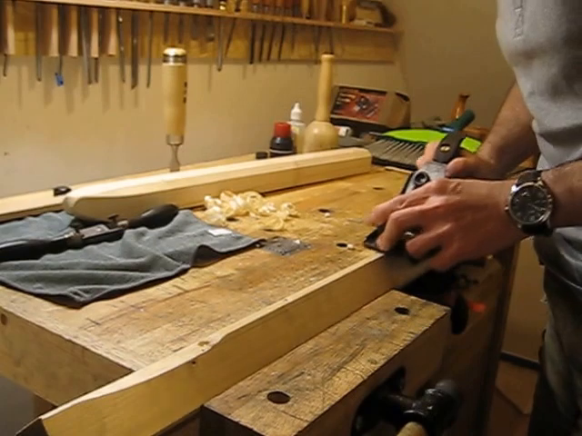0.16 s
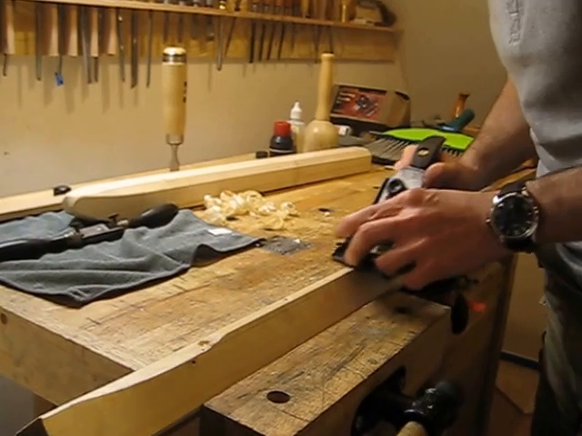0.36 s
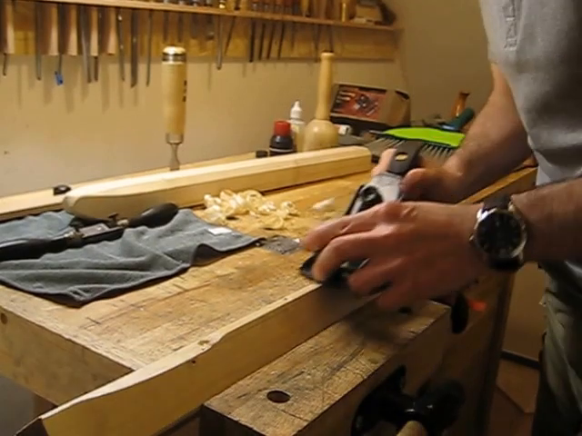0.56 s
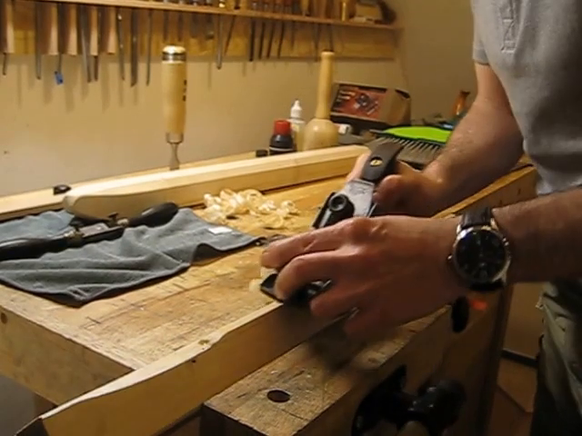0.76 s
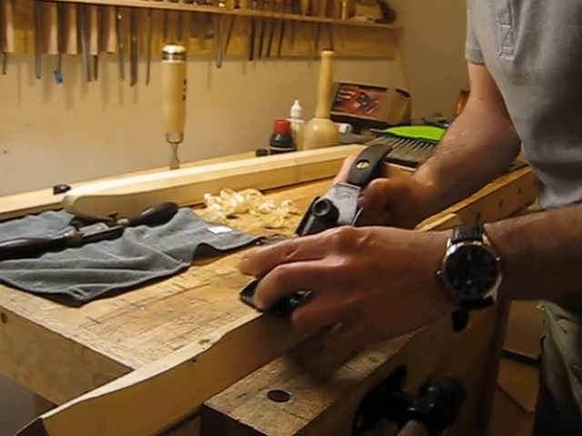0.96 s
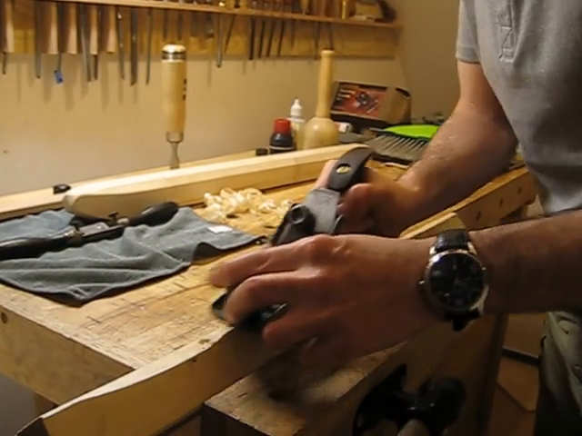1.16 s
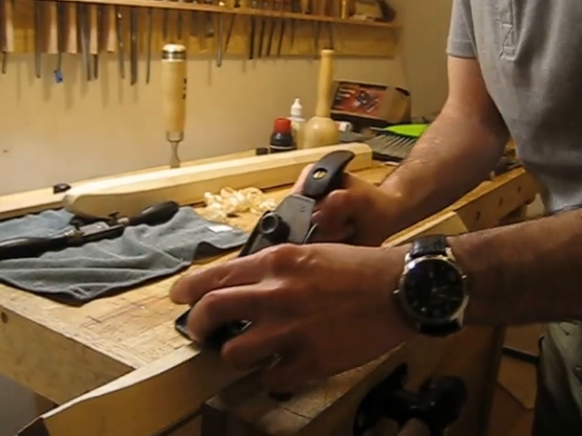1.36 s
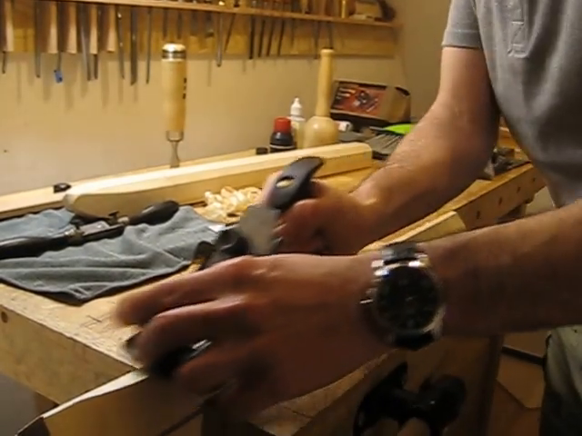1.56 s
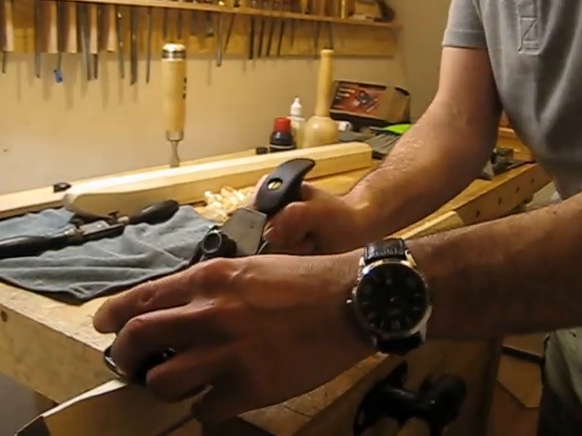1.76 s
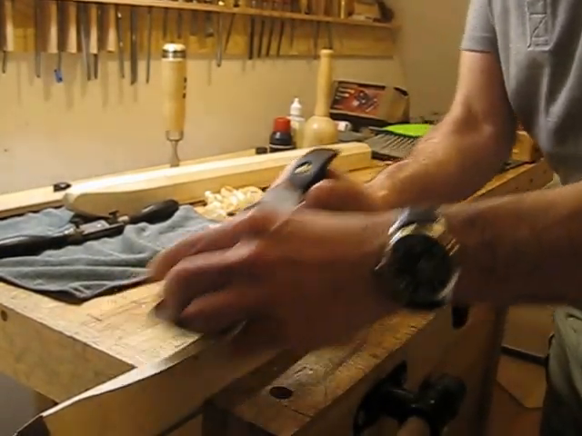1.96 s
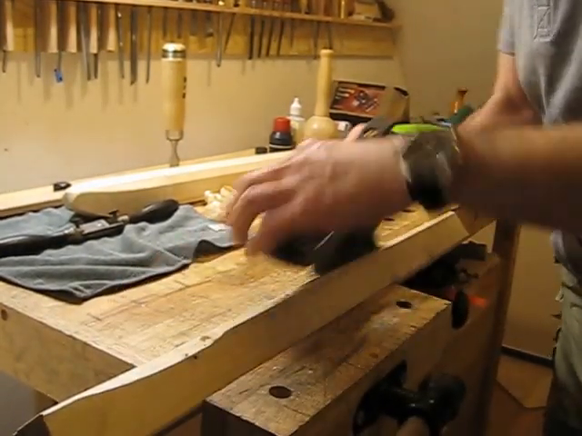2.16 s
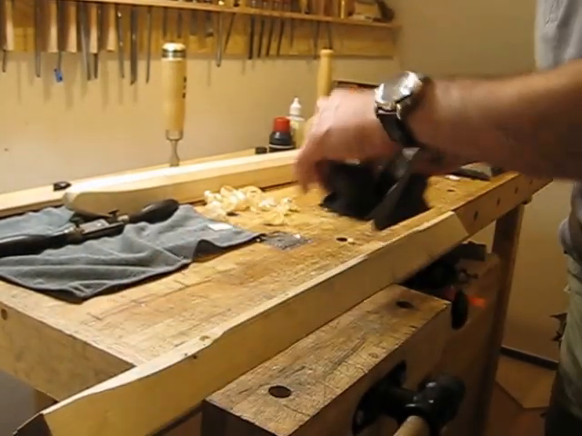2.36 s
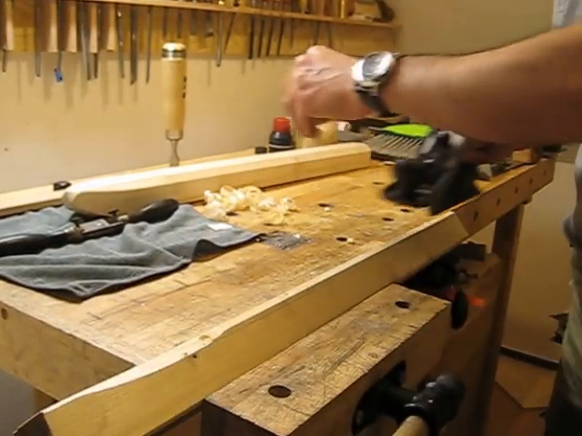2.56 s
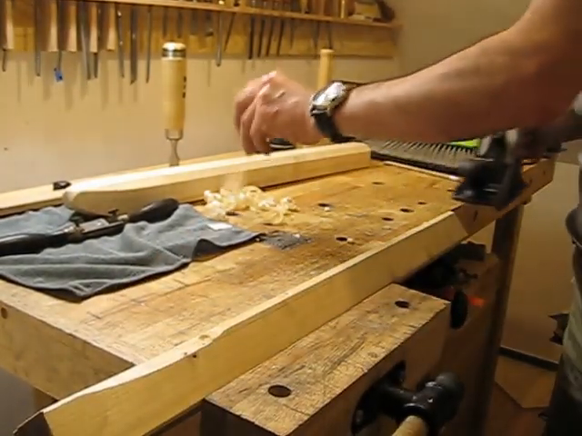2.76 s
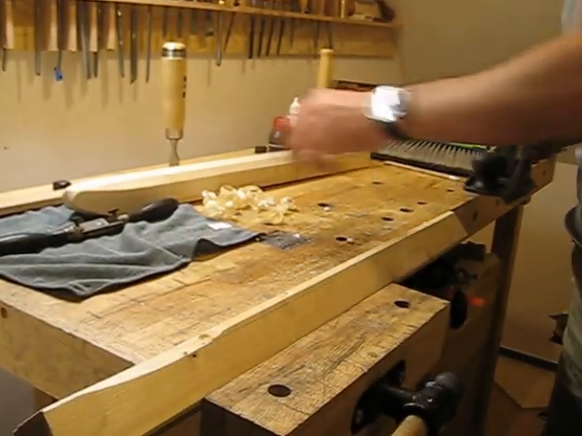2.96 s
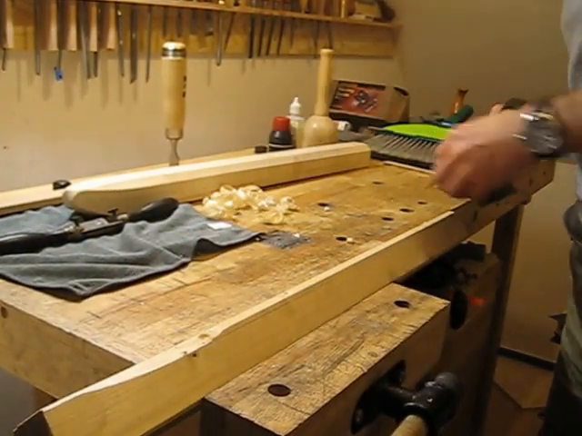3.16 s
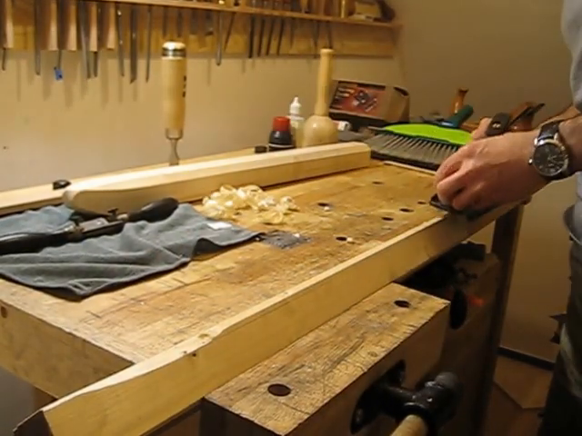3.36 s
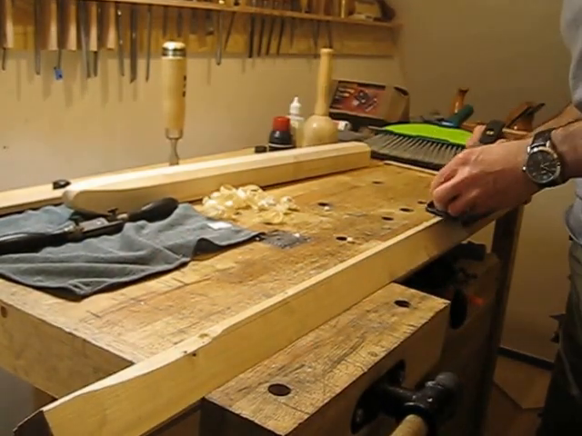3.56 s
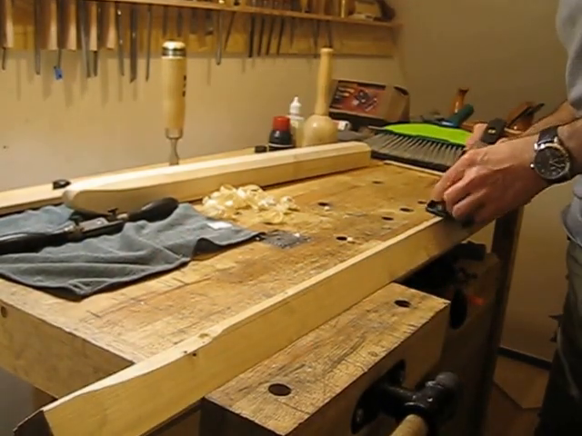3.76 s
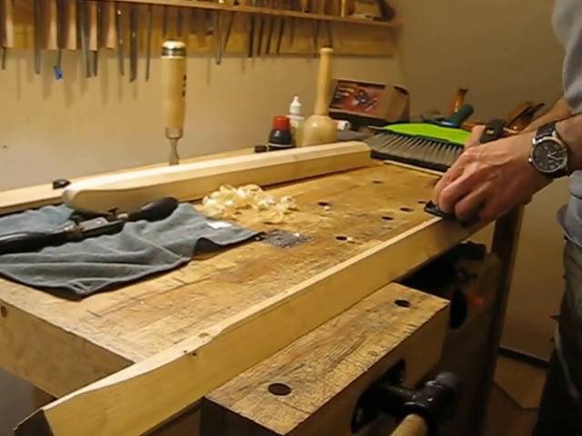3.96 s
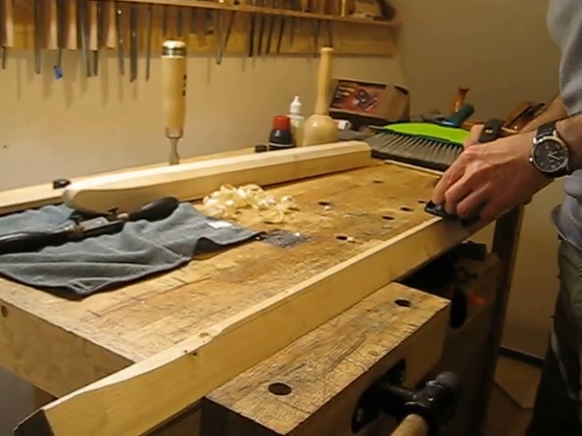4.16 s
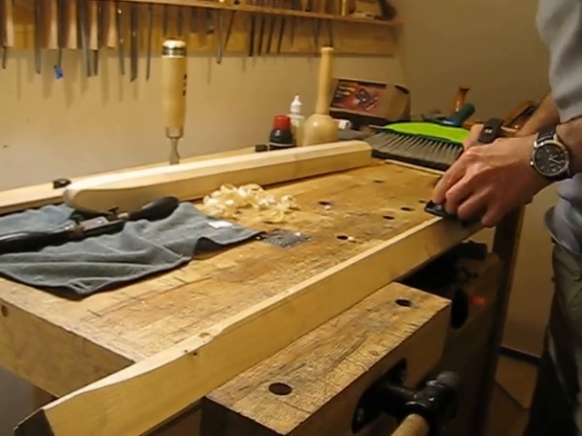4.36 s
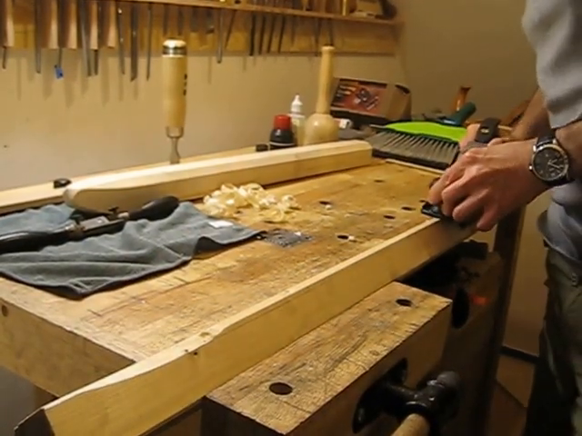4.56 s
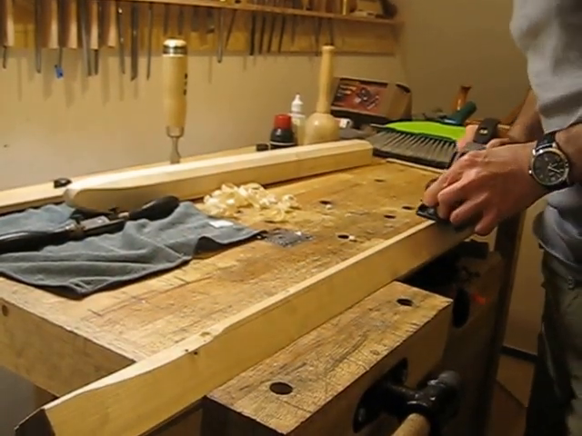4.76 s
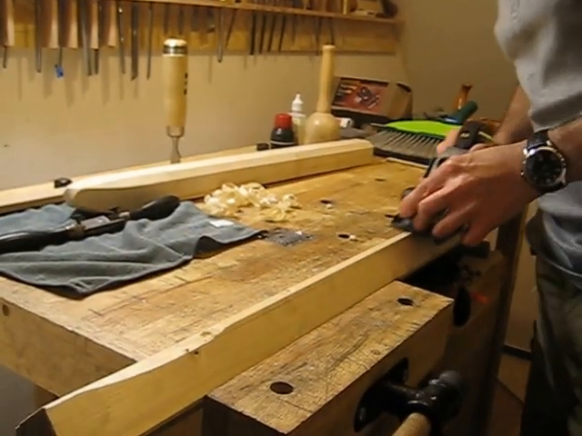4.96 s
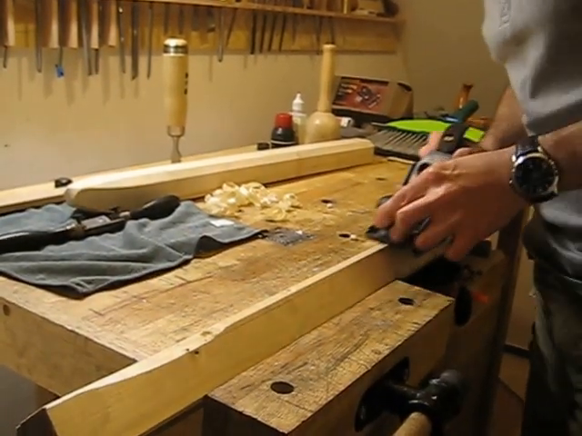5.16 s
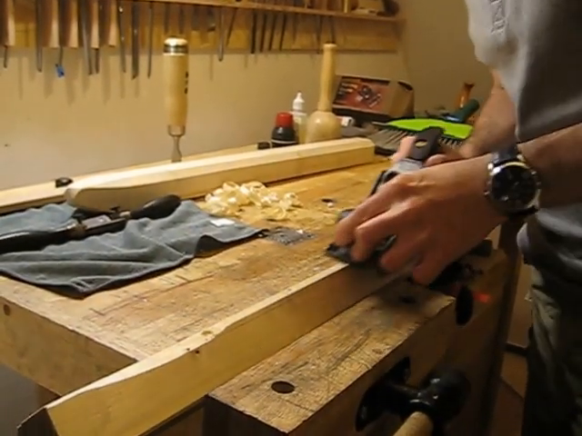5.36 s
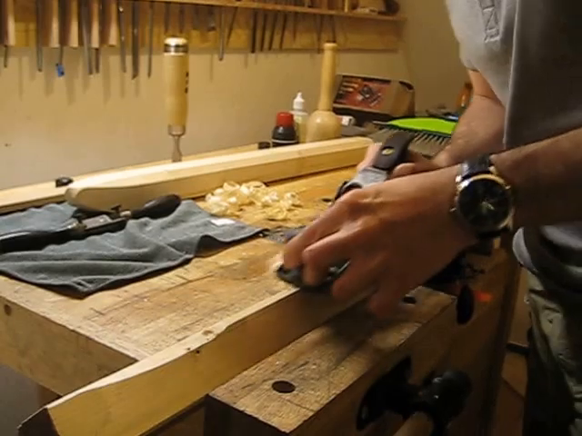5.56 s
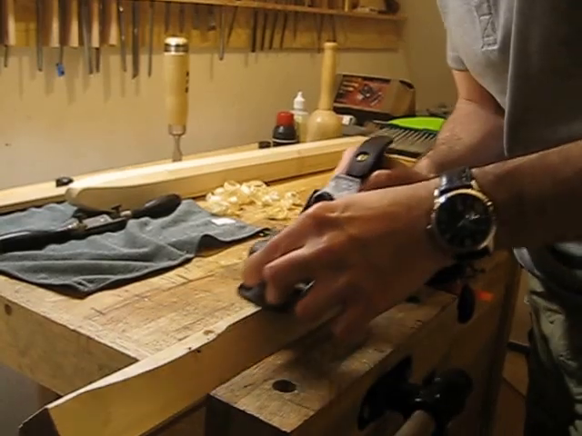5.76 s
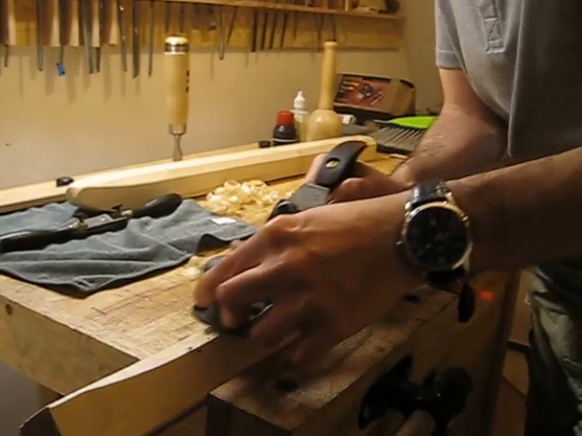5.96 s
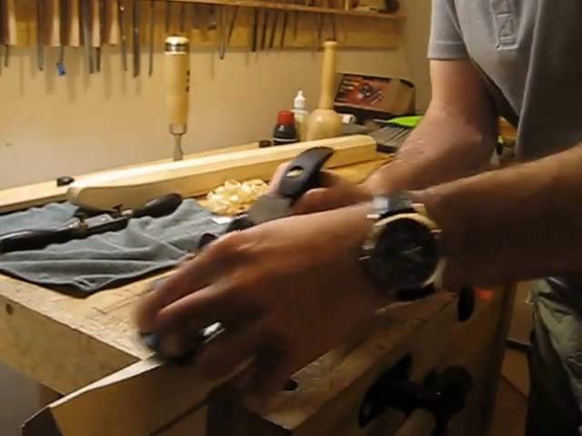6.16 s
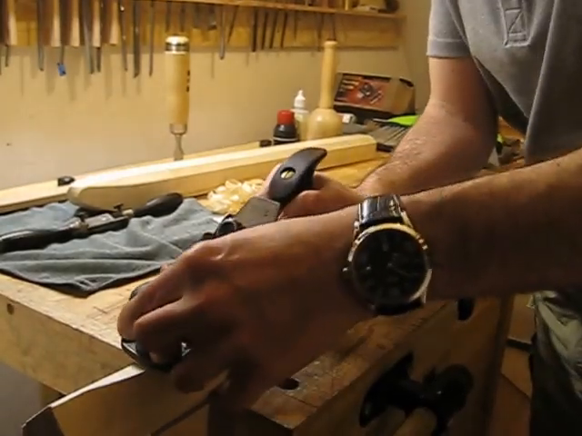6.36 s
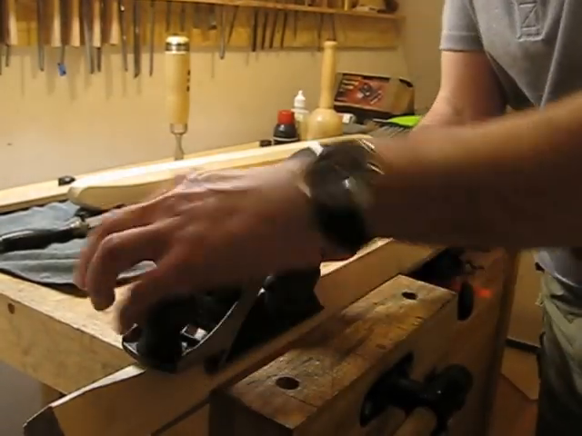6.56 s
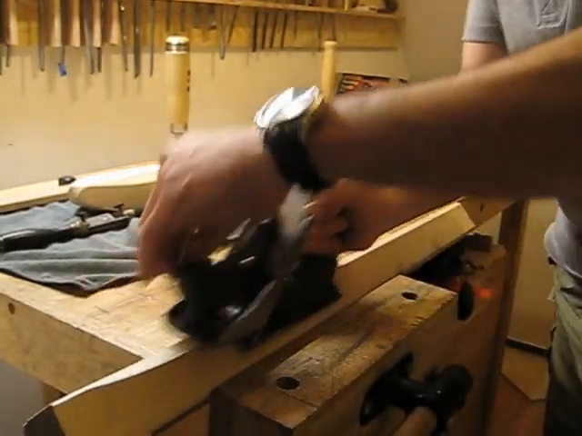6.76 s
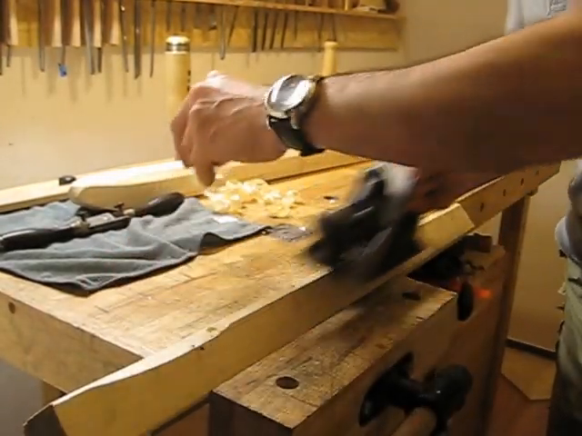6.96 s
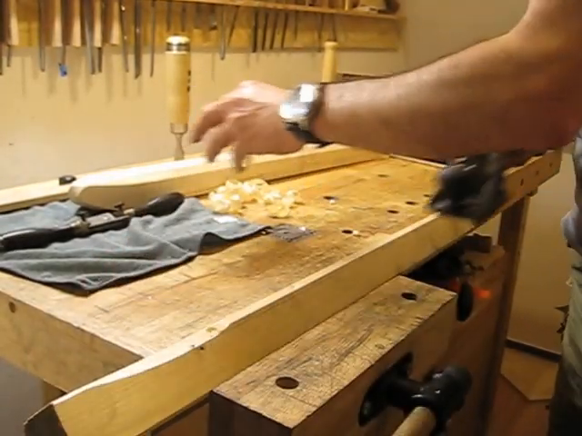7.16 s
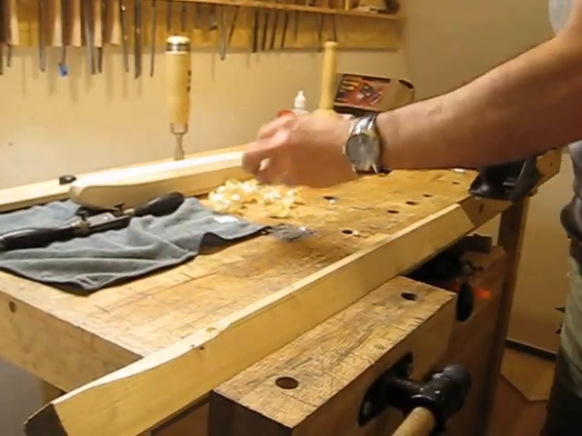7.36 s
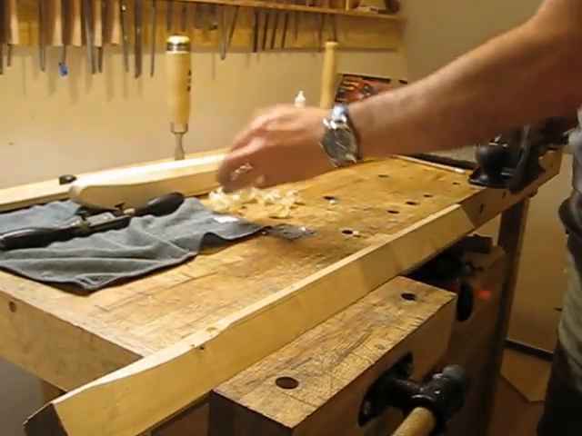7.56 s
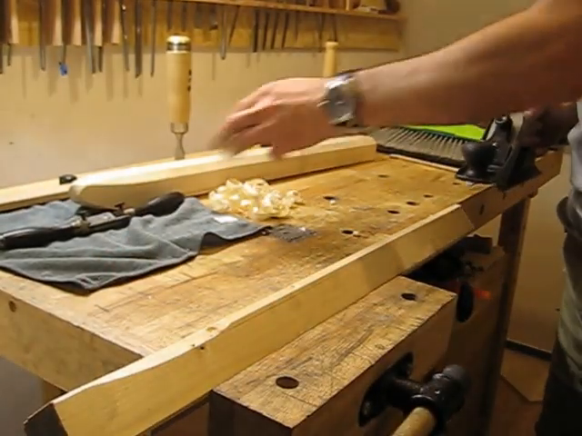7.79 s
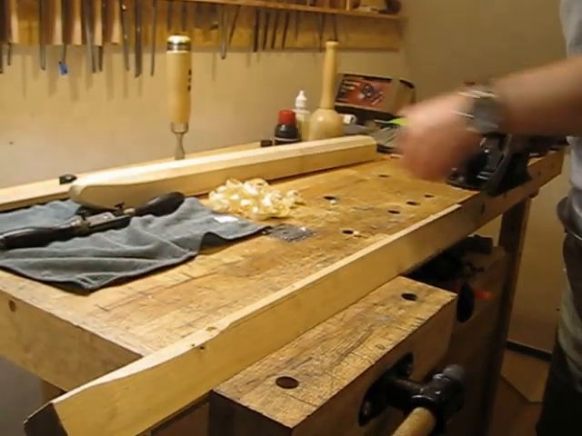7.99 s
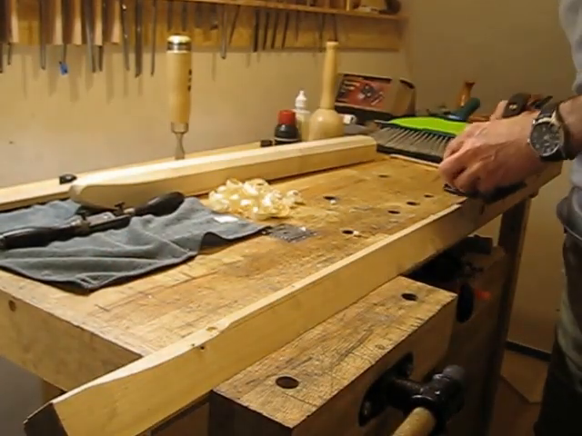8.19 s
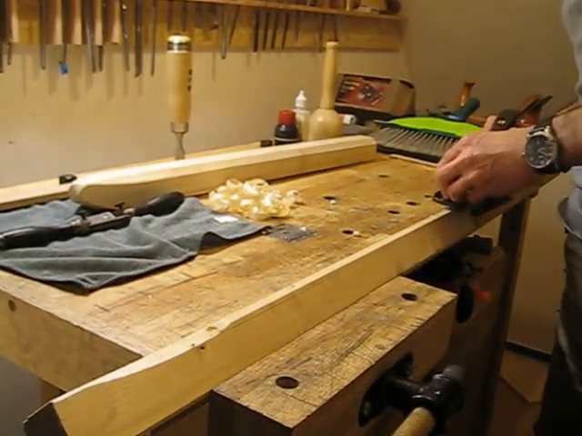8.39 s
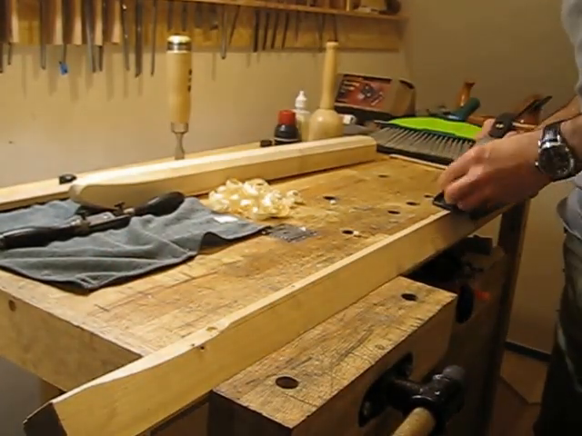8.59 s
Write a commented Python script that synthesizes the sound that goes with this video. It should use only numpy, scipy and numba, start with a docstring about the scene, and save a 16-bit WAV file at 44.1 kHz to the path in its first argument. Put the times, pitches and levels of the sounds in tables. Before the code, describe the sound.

A steel hand plane rasps along a wooden leg in one long stroke, the wood booming as the shaving hisses out. Dry shavings crackle softly, then the plane is set down with a sharp knock and clicks as it is rocked into place. A second long stroke follows with brief squeaks, then more crackling and a final knock. It sounds close, in a small workshop with faint hum and hiss.

```python
"""Two long rasping strokes of a steel hand plane along a wooden leg clamped to a bench in a small workshop.
The blade breaks fibres: the leg booms, the blade chatters, the shaving hisses out of the mouth.
After each stroke the shaving crackles as it is pulled out, and the plane is set down with a knock;
before the second it is rocked into place. Under it all lie room noise and mains hum.
The camera adds a thin whine and hiss, and turns its gain down on the loudest knocks."""
import sys
import numpy as np
from scipy import signal
from scipy.fft import rfft, irfft, next_fast_len
from scipy.io import wavfile
from scipy.ndimage import uniform_filter1d, map_coordinates
from numba import njit

SR = 44100
rng = np.random.default_rng(int(sys.argv[2]) if len(sys.argv) > 2 else 0)


def digitize_waveform(pressure):
    """Quantize a signal to 16-bit integers and store it at the path in sys.argv[1].

    Rows of a 2-D input are taken as channels; values are limited to [-1, 1].
    """
    field = np.atleast_2d(pressure).T
    bounded = np.clip(field, -1, 1)
    quanta = np.round(bounded * 32767).astype(np.int16)
    wavfile.write(sys.argv[1], SR, quanta)


N = 380583
TIME_S = np.arange(N) / SR

# steel plane modes: (frequency [Hz], level [dB], t60 [s])
PLANE_MODES = [(1110, -18, .14), (1144, -6, .14), (1285, -1, 0.11), (1680, -36, 0.096), (1677, -6, 0.26),
               (1860, -2.5, 0.22), (1933, 8.5, 0.059), (2056, 1.5, 0.19), (2223, 0, 0.052),
               (2390, 3.5, 0.033), (2400, -10, 0.071), (2743, -3.5, 0.084), (3000, 6.5, 0.081),
               (3370, 7.5, 0.057), (3779, -19, .13), (4340, 4, 0.097), (4600, -8, 0.19), (5070, -27, 0.11)]
# wooden leg modes: (frequency [Hz], level [dB], t60 [s])
LEG_MODES = [(443, -6.5, 0.058), (476, 5.5, 0.04), (554.4, -7.5, 0.19), (617.3, -2, 0.23), (679, -9, 0.18),
             (771, -1.5, 0.31), (842, -0.5, 0.29), (883, -12, 0.056), (971, 1, 0.22), (1340, 2, .14),
             (1376, 10.5, 0.081), (4160, -6, .16)]
# bench modes: (frequency [Hz], level [dB], t60 [s])
BENCH_MODES = [(80.6, -10, 0.49), (162, -0.5, 0.22), (204, 2, 0.36), (228.8, 2, 0.16), (277, -3, 0.15),
               (312.4, -13, 0.39), (358, -5, 0.28)]
# fibre rasp: (frequency [Hz], level [dB])
RASP_SPECTRUM = [(60, -76), (300, -63), (800, -8), (1050, 0), (1500, -2), (2000, -1.5), (2600, 0.5),
                 (3300, -6), (4000, -14.5), (4700, -7), (5400, -23), (9000, -41)]
# blade chatter: (frequency [Hz], level [dB])
CHATTER_SPECTRUM = [(100, -77), (330, -10.5), (460, -6), (620, 2.5), (1000, -4), (1400, -17.5), (4000, -42)]
def plane_strokes():
    """The blade breaks fibres; the breaks shake leg and plane while the shaving hisses out."""
    boom_db, chatter_db, rasp_db, hiss_db, fizz_db = stroke_levels_db()
    chatter_hz = chatter_pitch_hz()
    grip_db = wobble(28) + 1.42 * wobble(170)  # stick-slip in the grain
    cut = fractures(rate_hz=5000, scatter_db=3) * amp(grip_db)
    wood = through_modes(cut, BENCH_MODES + LEG_MODES, width_hz=4.2, lift=2.06)
    steel = through_modes(cut, PLANE_MODES, width_hz=11.4, lift=1)
    focus_db = np.clip(2.3 * (chatter_db + 15), -6, 3.5)
    chatter = gliding_ring(coloured(wood, CHATTER_SPECTRUM), chatter_hz, width_hz=45, focus_db=focus_db)
    rasp = coloured(edge_catching(steel, depth_db=2.5), RASP_SPECTRUM)
    hiss = shaving_hiss(grip_db, hiss_db, fizz_db)
    blade = amp(chatter_db - 2) * chatter + amp(rasp_db - 0.7) * rasp + hiss
    lows = filtered(blade, lambda hz: 1 / (1 + (hz / 500) ** 16))
    blade -= (1 - amp(-0.7 * skid_loss_db())) * lows  # skids also quieten the low wood
    cutting = bench_sway(cut) + leg_boom(wood, boom_db) + blade
    low_cut = signal.butter(3, 65, "high", fs=SR, output="sos")  # the strokes carry no deep bass
    return signal.sosfilt(low_cut, cutting)


# long strokes: (start [s], end [s], release t60 [s], boom [dB], hiss [dB])
STROKES = [(-0.05, 1.351, 0.57, -23.5, -32.5), (4.722, 6.174, 0.36, -26, -32.5)]
# depth of cut, one curve a stroke: (time [s], rasp level [dB])
BITE_CURVES = [
    [(0.0, -13), (0.082, -16.5), (0.126, -20.5), (0.348, -18), (0.36, -24), (0.65, -20), (0.71, -33),
     (0.758, -24.5), (0.804, -37.5), (1.01, -33), (1.108, -14.5), (1.142, -27), (1.262, -20.5), (1.35, -32)],
    [(4.79, -23), (4.918, -13), (5.168, -21), (5.324, -17.5), (5.338, -23.5), (5.546, -18), (5.596, -24),
     (5.9, -23), (5.912, -20.5), (5.998, -30), (6.088, -26.5), (6.126, -38), (6.166, -24.5), (6.19, -26.5)],
]
# push of the arms, one curve a stroke: (time [s], chatter level [dB])
PUSH_CURVES = [
    [(0.0, -23.5), (0.108, -18), (0.176, -23.5), (0.308, -17), (0.62, -20.5), (0.676, -11.5), (0.74, -20),
     (0.762, -13), (0.852, -29.5), (0.912, -31), (1.308, -13), (1.35, -25)],
    [(4.79, -30.5), (4.922, -18), (4.952, -24), (5.164, -21.5), (5.308, -14.5), (5.37, -19.5),
     (5.636, -17.5), (5.65, -15.5), (5.978, -16), (6.146, -26), (6.162, -17), (6.19, -29)],
]
# shaving tears off: (time [s], hiss change [dB], rasp change [dB])
TEARS = [(.75, -0.5, 3.5), (1.075, 7.5, -6), (5.32, -2, -2), (5.817, 10, 4.5), (5.92, -2, 3), (6.16, 6, 1)]
# shaving rushes out of the mouth: (time [s], half length [s], hiss change [dB], fizz change [dB])
FLARES = [(.05, 0.032, 5.5, -1), (0.553, 0.19, -2, 8), (4.886, 0.15, 5.5, 0), (5.467, 0.034, 1, 5)]
# short shoves that clear the leg's end or seat the blade: (start [s], end [s], level [dB], boom trim [dB])
SHOVES = [(1.47, 1.552, -25.5, -3), (4.411, 4.514, -25.5, -7.5)]
# shove mix: (boom [dB], chatter [dB], rasp [dB], hiss [dB], fizz [dB])
SHOVE_MIX_DB = (-0.5, -5, -2.5, -6.5, -27)
ENTRY_S, TEAR_HALF_S = 0.064, 0.017
def stroke_levels_db():
    """The arms' work sets five levels over time: boom, chatter, rasp, hiss and fizz."""
    tear_hiss_db = sum(db * swell(s, TEAR_HALF_S) for s, db, _ in TEARS)
    tear_rasp_db = sum(db * swell(s, TEAR_HALF_S) for s, _, db in TEARS)
    lull_db = sum(3 * swell(s + 0.047, 0.022) for s, *_ in TEARS)  # until the next curl forms
    flare_hiss_db = sum(db * swell(s, half_s) for s, half_s, db, _ in FLARES)
    flare_fizz_db = sum(db * swell(s, half_s) for s, half_s, _, db in FLARES)
    gains = np.zeros((5, N))
    for (start_s, end_s, t60_s, boom_db, hiss_db), bite, push in zip(STROKES, BITE_CURVES, PUSH_CURVES):
        bite_db = curve(bite)
        shaving_db = hiss_db + 0.11 * (bite_db + 25) + tear_hiss_db - lull_db
        levels_db = [boom_db + 4 * slowing(start_s, end_s) - skid_loss_db(),
                     curve(push),
                     bite_db + tear_rasp_db,
                     shaving_db + flare_hiss_db,
                     shaving_db - 15 + flare_fizz_db]
        gains += held(start_s, end_s, ENTRY_S, t60_s) * amp(levels_db)
    for start_s, end_s, db, boom_trim_db in SHOVES:
        mix_db = db + np.array(SHOVE_MIX_DB) + [boom_trim_db, 0, 0, 0, 0]
        gains += held(start_s, end_s, ENTRY_S, t60_s=0.44) * amp(mix_db)[:, None]
    return 20 * np.log10(gains + 1e-6)


def slowing(start_s, end_s):
    """The plane slows near full reach: 0 running freely, 1 at the stroke's end."""
    return np.clip((TIME_S - start_s) / (end_s - start_s), 0, 1) ** 6.05


# skids: (time [s], half length [s], boom loss [dB])
SKIDS = [(0.0, 0.13, 5.5), (0.17, .03, 1), (0.692, 0.062, 8), (1.1, 0.046, 4), (4.78, 0.068, 7.5),
         (5, 0.087, 17.5), (5.333, 0.08, 15), (5.563, 0.065, 15), (5.972, 0.032, 11)]
def skid_loss_db():
    """The leg booms less while the plane runs light."""
    return sum(db * swell(s, half_s) for s, half_s, db in SKIDS)


def chatter_pitch_hz(base_hz=668, sag_hz=190, skid_hz_per_db=2.8, wander_hz=35.3):
    """The chatter sinks as the plane slows, rises in skids and wanders with the grain."""
    sag = sum(slowing(start_s, end_s) * held(start_s, end_s, ENTRY_S, t60_s=0.77)
              for start_s, end_s, *_ in STROKES)
    return base_hz - sag_hz * sag + skid_hz_per_db * skid_loss_db() + wander_hz * wobble(14)


def edge_catching(x, depth_db):
    """The edge catches briefly, favouring now one resonance, now another."""
    bins = signal.stft(x, nperseg=512)[2]
    flicker = uniform_filter1d(rng.standard_normal(bins.shape), size=3, axis=0)
    flicker = uniform_filter1d(flicker, size=11, axis=1)
    return signal.istft(bins * amp(depth_db * unit(flicker)), nperseg=512)[1][:N]


# leg boom: (frequency [Hz], level [dB])
BOOM_SPECTRUM = [(35, -32), (70, -3), (115, -19), (138, -20), (160, 3), (200, -2.5), (340, 2), (520, -9.5),
                 (900, -51), (3000, -71)]
# leg resonance as the plane travels, one curve a stroke: (time [s], frequency [Hz])
BOOM_PITCH_CURVES = [
    [(.18, 205), (.26, 306), (.38, 323), (.43, 204), (.56, 205), (.67, 267), (.87, 167), (1.19, 168),
     (1.31, 214), (1.4, 167)],
    [(4.52, 330), (4.86, 172), (5.1, 254), (5.19, 175), (5.46, 337), (5.58, 343), (5.68, 210), (5.9, 165),
     (6.02, 226), (6.13, 182.5)],
]
def leg_boom(wood, level_db):
    """The harder the leg shakes, the more it locks on to one shifting resonance."""
    hz = curve(np.vstack(BOOM_PITCH_CURVES))
    ring = gliding_ring(coloured(wood, BOOM_SPECTRUM), hz, width_hz=32.5, focus_db=0.64 * (level_db + 31))
    return amp(level_db - 1.05) * ring


# shaving hiss: (frequency [Hz], level [dB])
HISS_SPECTRUM = [(300, -13), (1500, -12), (2500, 8), (5000, 2.5), (6500, 1.5), (8600, -1.5), (9800, -6),
                 (11500, -12), (14000, -49)]
# top-octave fizz: (frequency [Hz], level [dB])
FIZZ_SPECTRUM = [(8000, -13), (11500, -4), (13300, 8), (15500, -3)]
def shaving_hiss(grip_db, hiss_db, fizz_db):
    """The shaving curls out of the mouth in a dense run of tiny breaks."""
    curl = fractures(rate_hz=7000, scatter_db=4.5) * amp(1.2 * grip_db + 0.75 * wobble(60))
    return amp(hiss_db) * coloured(curl, HISS_SPECTRUM) + amp(fizz_db) * coloured(curl, FIZZ_SPECTRUM)


# bench rumble: (frequency [Hz], level [dB])
SWAY_SPECTRUM = [(45, -17), (75, -11), (105, 4), (150, -23), (400, -60)]
# bench sways: (time [s], half length [s], level [dB])
SWAYS = [(0.85, .12, -47), (1.2, 0.15, -43), (1.558, .06, -40), (4.62, 0.17, -51), (6.12, 0.043, -47)]
def bench_sway(cut):
    """The whole bench sways under the push."""
    return sum(amp(db) * swell(s, half_s) for s, half_s, db in SWAYS) * coloured(cut, SWAY_SPECTRUM)


# sole squeaks: (time [s], frequency [Hz], level [dB], half length [s])
SQUEAKS = [(4.478, 5010, -36.5, 0.026), (4.94, 1852, -26, 0.038), (5.542, 2390, -23.5, 0.042),
           (6.52, 1110, -49, 0.014)]
def sole_squeaks():
    """Steel sticks and slips on the wood for a moment at one wavering pitch."""
    out = np.zeros(N)
    for s, hz, db, half_s in SQUEAKS:
        envelope = np.exp(-0.5 * ((TIME_S - s) / half_s) ** 2)
        out += envelope * tone(hz, db, TIME_S, phase_rad=0.81 * wobble(130))
    return out


# plane set down on the leg: (time [s], level [dB], relative thud [dB])
LANDINGS = [(3.566, -1.5, -12), (8.5117, -1, -6.5)]
# sole rocked into place: (time [s], level [dB])
ROCKS = [(3.802, -28), (3.893, -18), (3.927, -18.5), (3.960, -11), (4.025, -26.5), (4.200, -13),
         (4.272, -8.5), (4.368, -22), (4.437, -6.5), (4.524, -9)]
def plane_knocks(heel_delay_s=0.004):
    """The plane lands toe first, then heel; rocking it into place mostly rings the steel."""
    out = np.zeros(N)
    for s, db, thud_db in LANDINGS:
        add(out, s, contact(db, crack_db=-4, thud_db=thud_db, leg_db=-12, plane_db=-37))
        add(out, s + heel_delay_s, contact(db + 1.8, crack_db=-4, thud_db=-8.5, leg_db=-23, plane_db=-36))
    for s, db in ROCKS:
        wood_db = -17.5 - 0.5 * db  # the wood follows only half of each change in dB
        add(out, s, contact(db, crack_db=-5, thud_db=wood_db - 4, leg_db=wood_db - 9, plane_db=-7.5))
    return out


# impact crack: (frequency [Hz], level [dB])
CRACK_SPECTRUM = [(100, -30), (400, -29), (800, -14), (1500, 5), (2500, -1), (3700, 4.5), (5200, -4.5),
                  (7300, -3), (10000, -10), (15000, -18)]
# crack decay: (frequency [Hz], t60 [s])
CRACK_DECAY = [(300, 0.13), (1000, 0.068), (3000, 0.023), (8000, 0.025), (15000, .018)]
# dense weak modes of the plane: (frequency [Hz], level [dB])
CLACK_SPECTRUM = [(200, -37), (700, -15), (1200, -5.5), (2000, 0), (2700, 1), (3600, -22), (4900, 0.5),
                  (5600, -14), (12000, -40)]
# dense weak modes of the leg: (frequency [Hz], level [dB])
KNOCK_SPECTRUM = [(100, -41), (400, -32), (650, 6), (900, 9), (1500, -5), (2400, -16), (4400, -9),
                  (5400, -39), (12000, -52)]
# bench and the things on it: (frequency [Hz], level [dB])
THUMP_SPECTRUM = [(50, -37), (110, -36), (160, 2), (280, -8.5), (550, -7), (700, -15), (1200, -13.5),
                  (2500, -27), (8000, -53)]
def contact(db, crack_db, thud_db, leg_db, plane_db):
    """Steel lands on wood: a crack, the ring of plane and leg, and the slower thud of the bench."""
    t = np.arange(SR // 2) / SR
    crack = amp(crack_db) * dying(noise(CRACK_SPECTRUM, len(t)), CRACK_DECAY)
    plane = ringing(PLANE_MODES, t) + amp(0.5) * burst(CLACK_SPECTRUM, t, t60_s=0.13)
    leg = ringing(LEG_MODES, t) + amp(1.5) * burst(KNOCK_SPECTRUM, t, t60_s=0.22)
    ring = (amp(plane_db) * plane + amp(leg_db) * leg) * rise(t, 0.0014)
    cutoff_hz = min(1650 + 7500 * amp(1.7 * db), 0.45 * SR)  # harder is brighter
    strike = signal.lfilter(*signal.butter(2, cutoff_hz, fs=SR), crack + ring)
    clutter = amp(-5) * burst(THUMP_SPECTRUM, t, t60_s=0.26)
    thud = amp(thud_db) * (ringing(BENCH_MODES, t) + clutter) * rise(t, 0.035)
    return amp(db) * (strike + thud)


# soft bumps of the sole: (time [s], level [dB])
BUMPS = [(2.036, -16), (2.055, -18.5), (2.109, -24), (2.175, -31), (6.932, -19), (6.968, -19.5), (7.0, -26),
         (7.04, -32)]
def return_bumps():
    """The sole brushes the leg on its way back, and the bench answers."""
    out, t = np.zeros(N), np.arange(SR // 3) / SR
    for s, db in BUMPS:
        bump = burst(THUMP_SPECTRUM, t, t60_s=0.22) + amp(-6.5) * ringing(BENCH_MODES, t)
        add(out, s, amp(db - 9) * bump * rise(t, 0.002))
    return signal.lfilter(*signal.butter(2, 120, "high", fs=SR), out)  # too light to move the whole bench


# loose shavings handled: (start [s], end [s], level [dB])
RUSTLES = [(2.028, 2.055, -42), (2.08, 2.127, -41.5), (2.262, 2.276, -41), (2.326, 2.338, -40),
           (2.412, 2.456, -37.5), (2.543, 3.2, -52), (2.835, 2.832, -45), (6.687, 6.764, -33.5),
           (6.908, 6.925, -39.5), (6.968, 6.99, -39.5), (7.325, 7.705, -45)]
# shavings snap: (time [s], level [dB])
SNAPS = [(0.366, -9.5), (0.5271, -9.5), (0.742, -8), (0.796, -13), (1.0742, -9), (1.5565, -9), (1.595, -12),
         (1.7515, -13.5), (2.4365, -10), (2.4617, -12.5), (2.84, -11), (2.8564, -11.5), (5.1236, -9),
         (5.324, -12), (5.776, -10), (5.826, -12), (6.0689, -3), (6.269, -8.5), (6.721, -20), (6.7614, -14),
         (6.789, -15), (7.7853, -20)]
# dry shaving: (frequency [Hz], level [dB])
SHAVING_SPECTRUM = [(60, -50), (200, -35), (700, -7.5), (1500, -3.5), (3000, 3), (5000, 0.5), (8000, -3),
                    (11000, -7.5), (15000, -22)]
def shavings():
    """Dry curls crackle in the fingers, and now and then one snaps."""
    handling = sum(amp(db) * held(start_s, end_s, attack_s=0.0054, t60_s=0.41)
                   for start_s, end_s, db in RUSTLES)
    crinkle_db = 2.5 * wobble(70) + 1.2 * wobble(31)
    out = handling * amp(crinkle_db) * coloured(fractures(rate_hz=1100, scatter_db=4.5), SHAVING_SPECTRUM)
    t = np.arange(SR // 10) / SR
    for s, db in SNAPS:
        add(out, s, amp(db - 6) * rise(t, 0.0015) * burst(SHAVING_SPECTRUM, t, t60_s=0.028))
    return out


def bench_hum(x, hz, width_hz, db):
    """One lightly damped part of the bench hums on after the work stops."""
    return amp(db) * signal.lfilter(*signal.iirpeak(hz, hz / width_hz, SR), x)


# workshop reverberation: (frequency [Hz], t60 [s])
ROOM_DECAY = [(100, 0.41), (300, 0.21), (1000, 0.17), (4000, 0.2), (8000, 0.16), (15000, 0.18)]
def workshop(x, wet_db):
    """Direct sound plus a short room echo with little bass."""
    t = np.arange(SR // 2) / SR
    tail = dying(rng.standard_normal(len(t)), ROOM_DECAY) * rise(t, 0.0031)
    tail = signal.lfilter(*signal.butter(2, 380, "high", fs=SR), tail)
    echo = signal.fftconvolve(x, tail / np.linalg.norm(tail))[:N]
    return (x + amp(wet_db) * echo) / np.hypot(1, amp(wet_db))


# room noise: (frequency [Hz], level [dB])
ROOM_SPECTRUM = [(25, -10), (50, -10), (120, -6.5), (220, -5), (350, -1), (480, -6.5), (1000, -7.5),
                 (3000, -9), (7000, -12.5), (10000, -14), (13000, -50)]
# camera hiss: (frequency [Hz], level [dB])
CAMERA_SPECTRUM = [(3000, -23), (6500, -16), (8500, -2.5), (10500, 4.5), (11300, -2.5), (12300, -6),
                   (15800, -10)]
# whine of the camera electronics: (frequency [Hz], level [dB])
WHINE_TONES = [(7570, -44.5), (15140, -62.5)]
def background(frame_hz=30, mains_hz=49.5):
    """Room noise, mains hum, the camera's hiss, and its whine, which restarts every frame."""
    frame_time_s = (TIME_S - 0.0115) % (1 / frame_hz)
    whine = sum(tone(hz, db, frame_time_s) for hz, db in WHINE_TONES)
    whine = filtered(whine, lambda hz: hz > 5000)
    floor = amp(-48) * noise(ROOM_SPECTRUM, N) + amp(-56) * noise(CAMERA_SPECTRUM, N)
    return floor + whine + tone(mains_hz, -64, TIME_S)


def limiter(x, ceiling_db, recovery_db_per_s):
    """The gain drops at once on a peak and recovers steadily."""
    over_db = np.maximum(20 * np.log10(np.abs(x) + 1e-9) - ceiling_db, 0)
    ramp_db = recovery_db_per_s * TIME_S
    reduction_db = np.maximum.accumulate(over_db + ramp_db) - ramp_db
    return x * amp(-uniform_filter1d(reduction_db, size=16))


def fractures(rate_hz, scatter_db):
    """Tiny breaks at random moments and of random sizes."""
    clicks = (rng.random(N) < rate_hz / SR) * rng.choice([-1, 1], N)
    return unit(clicks * amp(scatter_db * np.clip(rng.standard_normal(N), -2.5, 2.5)))


def through_modes(x, modes, width_hz, lift):
    """Fixed modes, damped by the hands, stand out of the scraping."""
    peaks = lambda f: sum(amp(db) / (1 + ((f - hz) / width_hz) ** 2) for hz, db, _ in modes)
    return filtered(x, lambda f: 1 + lift * peaks(f))


def gliding_ring(drive, hz, width_hz, focus_db):
    """A moving resonance mixed focus_db above its broadband drive."""
    ring = unit(resonator(drive, 2 * np.pi * hz / SR, 2 * np.pi * width_hz / SR))
    swing = np.abs(signal.hilbert(ring, next_fast_len(N))[:N])
    ring = unit(ring / np.hypot(swing, 0.9))  # friction bounds the swing
    return (amp(focus_db) * ring + drive) / np.hypot(1, amp(focus_db))


@njit
def resonator(x, rad_per_sample, damping):
    """A band-pass whose frequency moves."""
    y, low, band = np.zeros(len(x)), 0., 0.
    for i in range(len(x)):
        low += rad_per_sample[i] * band
        band += rad_per_sample[i] * (x[i] - low) - damping * band
        y[i] = band
    return y


def ringing(modes, t):
    """Damped modes, at new strengths for every blow."""
    hz, db, t60_s = np.transpose(modes)[:, :, None]
    size = amp(db + 2 * rng.standard_normal(hz.shape)) * rng.choice([-1, 1], hz.shape)
    return np.sum(size * amp(-60 * t / t60_s) * np.sin(2 * np.pi * hz * t), 0) / np.linalg.norm(size)


def dying(x, decay):
    """Each frequency of x dies at its own speed."""
    hz, t, bins = signal.stft(x, SR, nperseg=128)
    fade = amp(-60 * t / along(decay, hz)[:, None])
    return signal.istft(bins * fade, SR, nperseg=128)[1][:len(x)]


def burst(spectrum, t, t60_s):
    """Decaying coloured noise."""
    return amp(-60 * t / t60_s) * noise(spectrum, len(t))


def noise(spectrum, samples):
    """Steady coloured noise, rms 1."""
    return coloured(rng.standard_normal(samples), spectrum)


def tone(hz, rms_db, t, phase_rad=0):
    """A sine."""
    return amp(rms_db) * np.sqrt(2) * np.sin(2 * np.pi * hz * t + phase_rad)


def coloured(x, spectrum):
    """x shaped by a spectrum, rms 1."""
    return unit(filtered(x, lambda hz: amp(along(spectrum, hz))))


def filtered(x, response):
    """x times a frequency response."""
    size = next_fast_len(len(x) + 8192)
    return irfft(rfft(x, size) * response(np.fft.rfftfreq(size, 1 / SR)), size)[:len(x)]


def along(points, hz):
    """Interpolate (frequency [Hz], value) on a log axis."""
    knots_hz, values = np.transpose(points)
    return np.interp(np.log(hz + 1), np.log(knots_hz + 1), values)


def curve(points):
    """Interpolate (time [s], value) at every sample."""
    return np.interp(TIME_S, *np.transpose(points))


def held(start_s, end_s, attack_s, t60_s):
    """An envelope that rises, holds, and dies away after end_s."""
    attack = np.clip((TIME_S - start_s) / attack_s, 0, 1) ** 2
    return attack * amp(-60 * np.maximum(TIME_S - end_s, 0) / t60_s)


def rise(t, tau_s):
    """An exponential onset."""
    return 1 - np.exp(-t / tau_s)


def swell(centre_s, half_s):
    """A flat-topped bump of height 1."""
    return np.exp(-((TIME_S - centre_s) / half_s) ** 4)


def wobble(knots_per_s):
    """A smooth random curve."""
    knots = rng.standard_normal(int(N * knots_per_s / SR) + 4)
    return map_coordinates(knots, [TIME_S * knots_per_s])


def add(track, start_s, sound):
    """Mix a sound into a track."""
    part = track[round(start_s * SR):][:len(sound)]
    part += sound[:len(part)]


def amp(db):
    """Decibels to gain."""
    return 10 ** (np.asarray(db) / 20)


def unit(x):
    """Scale to rms 1."""
    return x / np.sqrt(np.mean(x ** 2) + 1e-20)


def scene():
    """Strokes, knocks and shavings in the workshop, over the background; mono."""
    cutting = plane_strokes()
    knocks = plane_knocks() + return_bumps()
    hum = bench_hum(cutting + knocks, hz=307.5, width_hz=1, db=-2)
    work = workshop(cutting + sole_squeaks(), wet_db=-8)
    work += workshop(knocks, wet_db=-7.5)
    work += workshop(shavings(), wet_db=-3)
    return (work + hum + background())[None]


def record(dry):
    """The camera limits peaks and keeps nothing above its band limit."""
    limited = limiter(dry[0], ceiling_db=-1.5, recovery_db_per_s=69)
    return filtered(limited, lambda hz: hz < 15900)[None]


dry = scene()
out = record(dry)
digitize_waveform(out)
```